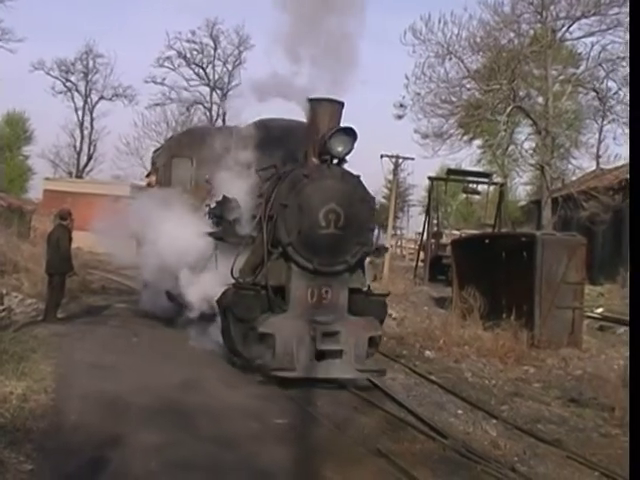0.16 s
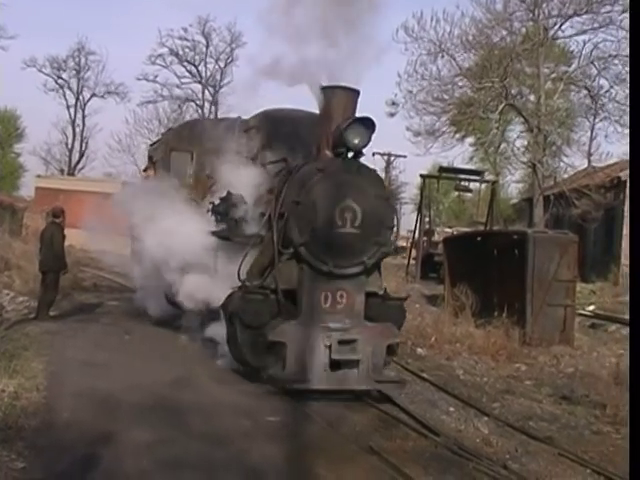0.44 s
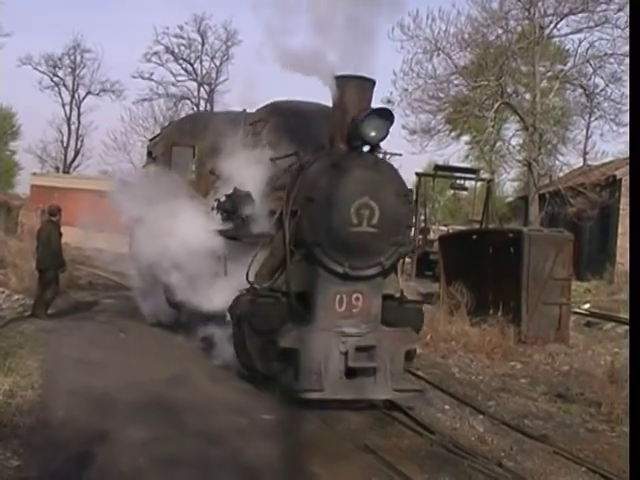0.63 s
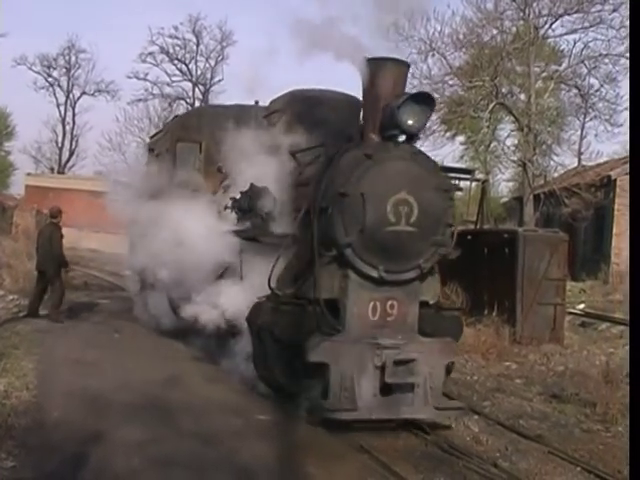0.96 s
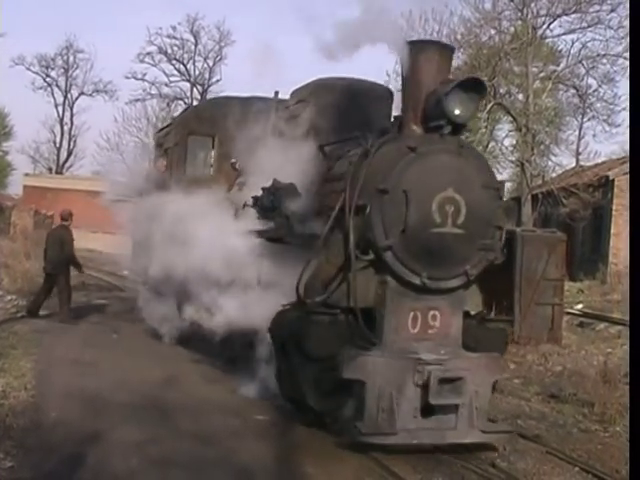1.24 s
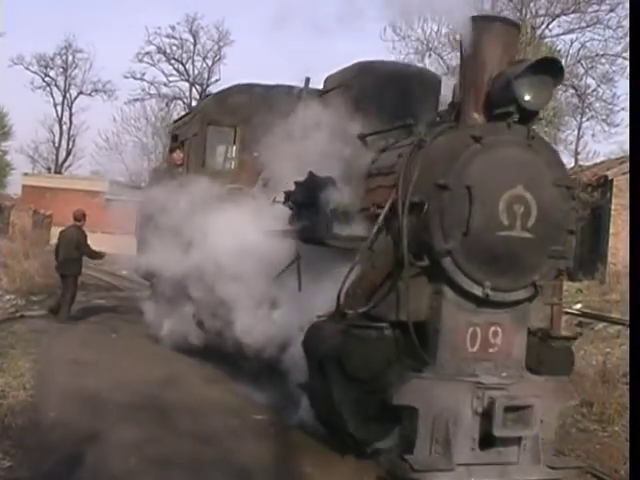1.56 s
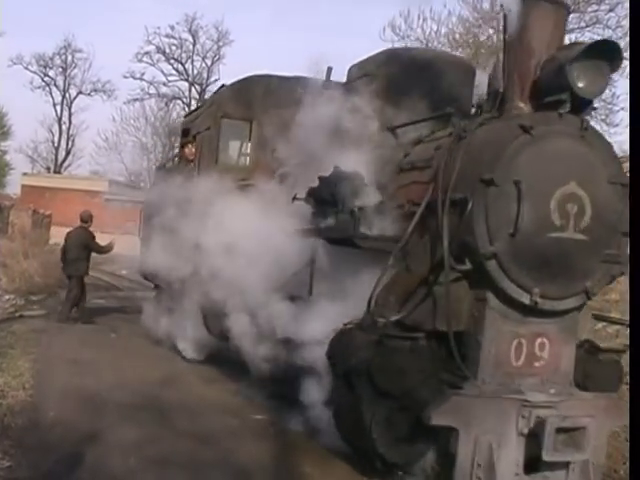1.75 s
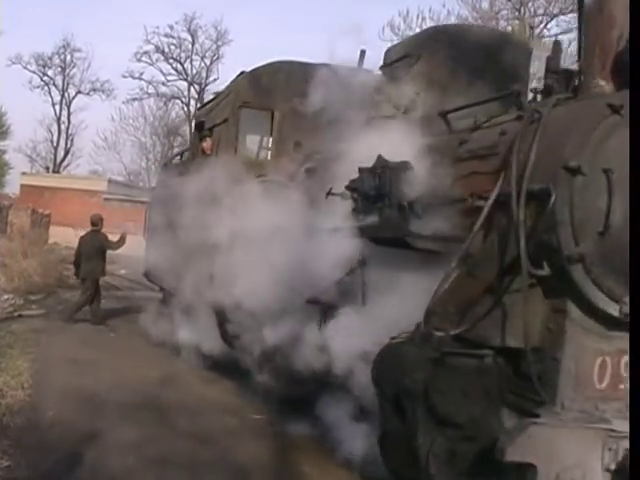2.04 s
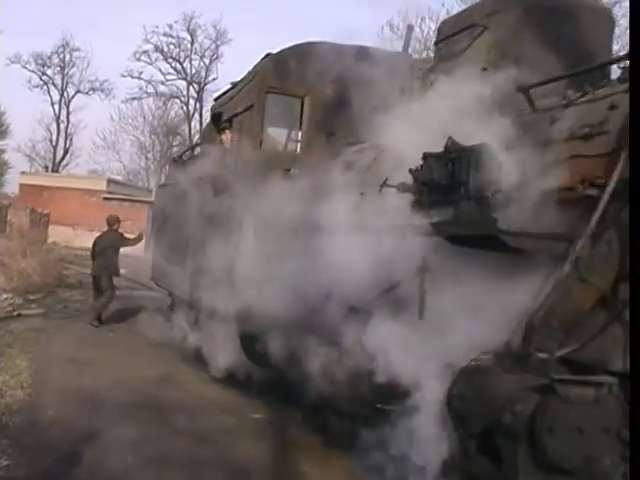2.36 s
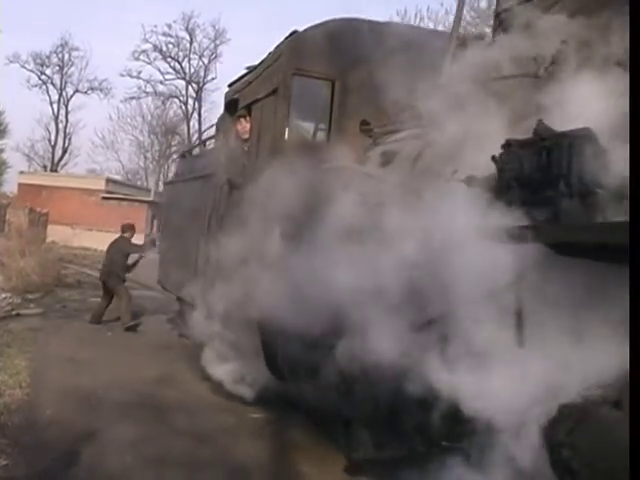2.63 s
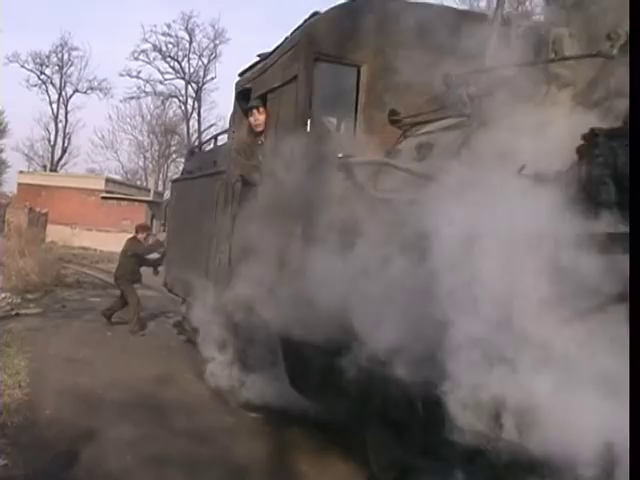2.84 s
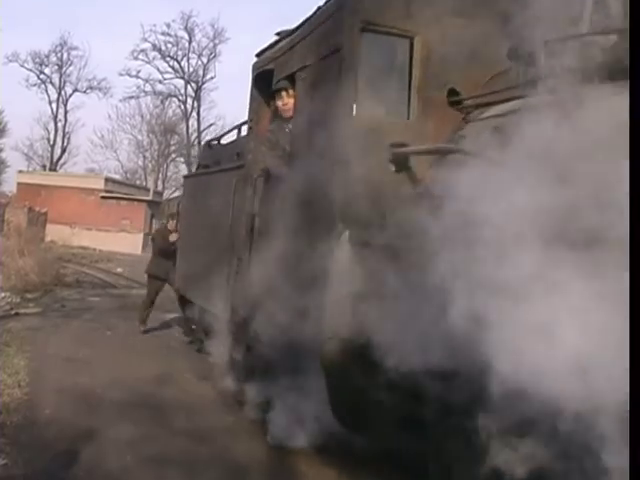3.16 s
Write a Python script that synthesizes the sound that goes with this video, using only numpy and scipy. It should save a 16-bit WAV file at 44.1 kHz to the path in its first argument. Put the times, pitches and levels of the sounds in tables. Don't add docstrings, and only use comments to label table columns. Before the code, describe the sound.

A small steam locomotive passes in an open yard, close to a stereo microphone. Hollow, low chimney puffs beat about nine times a second irregularly, strongest from 0.5 to 2.7 s, over a humming draught. Wet steam hisses and spits, moving right. Dry metal knocks begin near 0.7 s and crowd together after 1.4 s, with brief clinks and dull short echoes. After 2.9 s puffs and hiss weaken; knocks continue to 3.3 s.

```python
import sys
import numpy as np
from scipy import signal
from scipy.fft import rfft, irfft
from scipy.io import wavfile
from scipy.ndimage import uniform_filter1d

SR = 44100
rng = np.random.default_rng(int(sys.argv[2]) if len(sys.argv) > 2 else 0)


def nominal_scale(level):
    x = np.asarray(level, float) / 20
    return 10 ** x


def unload_audio(sound):
    columns = np.transpose(np.atleast_2d(sound))
    steps = np.round(np.clip(columns, -1, 1) * 32767)
    wavfile.write(sys.argv[1], SR, steps.astype(np.int16))


N = 145530
T = np.arange(N) / SR

# t/s of the peak, level/dB, length/s, overtones/dB
EXHAUST_BEATS = [(0.148, -33.5, 0.047, 10), (0.188, -31, 0.015, 0.5), (0.32, -29.5, 0.098, 3),
                 (0.427, -33.5, 0.079, -5), (.52, -22, 0.045, -1), (0.679, -27, 0.06, -3),
                 (0.727, -32, 0.025, -3.5), (0.861, -25, 0.045, -0.5), (0.905, -24.5, 0.039, -16),
                 (1.02, -24, 0.088, -4), (1.212, -20, 0.026, -2), (1.299, -28, .04, -18),
                 (1.361, -25, 0.034, 1.5), (1.406, -28, 0.03, -2), (1.548, -26, 0.078, -1.5),
                 (1.617, -36, 0.041, 7.5), (1.693, -24, 0.088, -1.5), (1.769, -24.5, 0.024, -15),
                 (1.85, -25, 0.017, -18), (1.898, -22.5, 0.055, -5), (2.022, -22.5, 0.055, -6.5),
                 (2.128, -29.5, 0.021, -31), (2.204, -25, 0.055, -4), (2.363, -35, 0.21, 3.5),
                 (2.543, -22, 0.051, -5), (2.629, -28.5, 0.015, -3), (2.682, -31, 0.061, 0.5),
                 (2.856, -35.5, 0.066, 7.5), (2.999, -47, 0.11, 10), (3.173, -39, 0.057, 4),
                 (3.245, -53, 0.069, 17.5)]
# f/Hz, width/Hz, level/dB
CHIMNEY_OVERTONES = [(293, 59, 5.5), (493, 100, 4.5), (632, 41, -2), (790, 430, -1.5)]
# t/s, f/Hz
CHIMNEY_PITCH = [(0, 244.1), (.9, 232), (1.7, 215.5), (3.3, 216.1)]
# t/s, level/dB, left-right/dB
STEAM_FLOW = [(0, -42.5, -2.5), (.4, -43.5, -3), (.51, -40.5, -3.5), (.9, -42.5, -2.5), (1.1, -42.5, -3),
              (1.2, -41.5, -4), (1.6, -43, -3), (1.9, -40, -5.5), (2.2, -44.5, -4.5), (2.55, -41.5, -8.5),
              (2.89, -43.5, -9.5), (2.91, -48, -10.5), (3.05, -53.5, -15.5), (3.3, -53, -19)]
# f/Hz, level/dB per Hz
STEAM_COLOUR = [(400, -9), (600, -13), (1200, -10), (2900, -8.5), (3800, -11.5), (7000, -12.5),
                (11000, -15), (14300, -18.5)]
# t/s, level/dB
SPUTTER_LEVEL = [(0, -50), (.5, -41), (.65, -45), (1.15, -43.5), (1.45, -43.5), (2.1, -44.5), (2.2, -41.5),
                 (2.3, -53), (2.45, -42), (2.85, -40.5), (2.93, -47.5), (3.3, -48.5)]
# t/s, peak level/dB, colour f/Hz, left-right/dB, t60/s
# (time to fall 60 dB)
KNOCKS = [(0.678, -16.5, 2150, 3.5, 0.17), (3.12, -22, 3020, -3, 0.11), (.976, -19, 3340, 2, 0.12),
          (1.366, -16, 1530, 3, 0.14), (1.506, -29, 1590, 1.5, 0.18), (1.612, -20, 970, -7, 0.24),
          (1.661, -21.5, 3020, -4, 0.11), (1.895, -18, 983, -3.5, 0.1), (1.942, -16.5, 2380, -3, 0.11),
          (2.032, -16, 2040, 3, 0.12), (2.164, -23, 1200, 1.5, 0.91), (2.35, -26, 1490, -2, 0.76),
          (2.445, -25.5, 1030, 5, 0.54), (2.616, -24, 1500, -6, 0.051), (2.678, -15, 1300, -2.5, 0.18),
          (2.731, -22.5, 2030, 2, 0.14), (2.815, -20, 1240, -2, 0.064), (2.894, -17.5, 1280, -14, 0.059),
          (3.009, -23, 1450, -8, 0.055), (3.136, -21.5, 2970, -4, 0.11), (3.166, -16, 700, -8.5, 0.086),
          (3.229, -19.5, 1410, -8, 0.1), (3.246, -19.5, 2290, -5, 0.068)]
# f/Hz, level/dB, t60/s
ROD_MODES = [(1140, -13, 0.09), (1300, -10, 0.19), (2030, 0, 0.0077), (2410, -7, 0.018),
             (2890, -6.5, 0.023), (4390, -21, 0.19)]
# t/s, peak level/dB, f/Hz, t60/s
CLINKS = [(.679, -29, 2210, 0.025), (0.68, -39, 2800, 0.032), (0.685, -28, 1870, .06),
          (1.196, -24.5, 1850, .03), (1.367, -21, 2770, .05), (1.368, -27, 4190, .04),
          (1.372, -28, 2170, 0.033), (1.506, -28, 1590, 0.046), (1.51, -30, 2360, 0.054),
          (1.613, -28, 970, 0.039), (1.62, -24, 1085, 0.077), (1.663, -23, 3450, .03),
          (1.665, -29, 2850, 0.044), (1.712, -29, 2020, 0.036), (1.945, -28, 2440, .06),
          (2.032, -25.5, 1164, .1), (2.031, -19, 4380, .03), (2.031, -30, 2820, .05),
          (2.035, -25, 1980, 0.025), (2.057, -38, 2030, 0.15), (2.165, -35, 1750, 0.043),
          (2.18, -30.5, 1300, .2), (2.208, -31, 2496, .12), (2.216, -32, 4420, 0.088),
          (2.248, -33, 1300, .12), (2.352, -40.5, 2900, 0.066), (2.361, -30, 1467, 0.073),
          (2.378, -32, 2900, .06), (2.446, -26.5, 1050, 0.11), (2.457, -31, 2550, 0.04),
          (2.618, -23.5, 1720, .04), (2.679, -20, 3800, .018), (2.679, -20, 1080, 0.035),
          (2.691, -29.5, 1300, 0.22), (2.731, -24, 2020, 0.076), (2.775, -31, 2550, .1),
          (2.78, -31.5, 1300, 0.12), (2.782, -32, 3900, .04), (2.816, -27, 2290, .03),
          (2.827, -27, 1230, 0.034), (2.959, -34, 1090, .04), (3.036, -37.5, 1250, 0.05),
          (3.082, -35, 1250, .04), (3.137, -26, 2970, .03), (3.232, -23, 1344, 0.032),
          (2.881, -26, 1290, .03), (2.893, -14, 1290, .015), (3.167, -20, 3140, .02),
          (3.247, -27.5, 2410, .04)]
# t/s, level/dB
DRAUGHT_LEVEL = [(0.0, -38), (1.64, -36), (2.88, -35.5), (2.92, -40), (3.3, -42.5)]
# f/Hz, level/dB per Hz
DRAUGHT_COLOUR = [(12, -56), (20, -18.5), (151, -10.5), (228, -2), (344, -13.5), (492, -14), (706, -30),
                  (809, -21), (1200, -28), (1560, -50), (2640, -120)]
# f/Hz, likeness (0 to 1)
CHANNEL_LIKENESS = [(300, 0.97), (700, 0.92), (1620, 0.89), (4870, 0.73), (8000, 0.77), (10500, 0.85),
                    (12500, 1), (14000, 0.44)]
# f/Hz, left-right/dB
MICROPHONE_TILT = [(300, 2.5), (1500, 3.5)]
# delay t/s, level/dB
ECHOES = [
    (.011, -11.5),
    (.027, -18),
]
# t/s, depth/dB
DUCKS = [(0.529, 3.5), (.70, 0), (1.215, 3.5), (1.385, 2), (1.69, 5), (1.905, 1), (2.035, 3.5), (2.55, 2),
         (2.69, 3.5), (2.894, 4.5), (3.168, 2)]


def rms_one(x):
    return x / np.sqrt(np.mean(x ** 2) + 1e-20)


def in_time(rows):
    s, *columns = np.transpose(rows)
    return [np.interp(T, s, column) for column in columns]


def at_hz(points, hz):
    table_hz, values = np.array(points).T
    return np.interp(np.log(hz), np.log(table_hz), values)


def pan(left_right_db):
    return nominal_scale(np.multiply.outer([.5, -.5], np.atleast_1d(left_right_db)))


def drift(rate_hz):
    hop = 40
    r = np.exp(-2 * hop * np.pi * rate_hz / SR)
    chance = rng.standard_normal(N // hop + 2002)
    slow = signal.lfilter([1], [1, -2 * r, r * r], chance)[2000:]
    return np.interp(np.arange(N) / hop, np.arange(len(slow)), rms_one(slow - slow.mean()))


def resonance(x, hz, width_hz):
    r = np.exp(-np.pi * width_hz / SR)
    gain = (1 - r * r) / 2
    poles = [1, -2 * r * np.cos(2 * np.pi * hz / SR), r * r]
    return signal.lfilter(np.array([1, 0, -1]) * gain, poles, x + 1e-18)


def banded_noise(spectrum, edges, shared_db, own_db):
    out = 0
    together = drift(19.0)
    white = rng.standard_normal((2, 2, N))
    for k, (low, high) in enumerate(zip(edges, edges[1:])):
        band = signal.butter(2, [low, high], "band", fs=SR, output="sos")
        mid, side = signal.sosfilt(band, white[k % 2])
        hz = np.sqrt(low * high)
        alike = np.clip(at_hz(CHANNEL_LIKENESS, hz), 0, 1)
        gain = nominal_scale(at_hz(spectrum, hz) + shared_db * together + own_db * drift(27))
        stereo = np.sqrt(1 + alike) * mid + np.sqrt(1 - alike) * side * [[1], [-1]]
        out = out + gain * pan(at_hz(MICROPHONE_TILT, hz)) * stereo
    return rms_one(out)


def beats():
    thump_hz, thump_width_hz, thump_db = 104, 73, -22
    white = rng.standard_normal((3, N))
    tone = chimney()
    upper = 0
    for k, (hz, width_hz, db) in enumerate(CHIMNEY_OVERTONES):
        upper = upper + nominal_scale(db) * rms_one(resonance(white[1], hz, width_hz)) * (-1) ** k
    upper = rms_one(upper)
    upper = upper / np.sqrt(uniform_filter1d(upper ** 2, size=500) + 0.12)
    thump = rms_one(resonance(white[2], thump_hz, thump_width_hz))
    push, sharp = np.zeros(N), np.zeros(N)
    for s, db, length, overtone_db in EXHAUST_BEATS:
        spread = np.where(T < s, .3, .45) * length
        shape = np.exp(-.5 * ((T - s) / spread) ** 2)
        push += nominal_scale(db) * shape
        sharp += nominal_scale(db + overtone_db) * shape ** 1.27
    return pan(2.7) * push * (tone + nominal_scale(thump_db) * thump) + pan(2.8) * sharp * upper


def chimney():
    width_hz, wander_hz = 26.6, 13.01
    r = np.exp(-np.pi * width_hz / SR)
    chance = [1, 1j] @ rng.standard_normal((2, N + 2000))
    sway = signal.lfilter([1], [1, -r], signal.lfilter([1], [1, -r * r], chance))[2000:]
    power = np.abs(sway) ** 2
    sway = sway / np.sqrt(power + 0.87 * np.mean(power))
    pitch_hz = in_time(CHIMNEY_PITCH)[0] + wander_hz * drift(8.0)
    return rms_one((sway * np.exp(2j * np.pi * np.cumsum(pitch_hz) / SR)).real)


def steam():
    flow_db, left_right_db = in_time(STEAM_FLOW)
    hiss = banded_noise(STEAM_COLOUR, np.geomspace(500, 17000, 15), shared_db=-0.5, own_db=0.5)
    return nominal_scale(flow_db + 6.5) * pan(left_right_db) * hiss


def sputter():
    spits_per_s, spit_cycles, pitches = 1500, 14.0, 14
    whistle_hz, whistle_width_hz, whistle_db = 2900, 180, -9.5
    sizes = nominal_scale(2.5 * np.minimum(rng.exponential(1, N), 4)) * rng.choice([-1, 1], N)
    born = rng.random(N) < spits_per_s * nominal_scale(5.0 * drift(10)) / SR
    dealt = rng.integers(0, pitches, N)
    sides_db = rng.normal(0, 6.9, N)
    spits = 0
    for k, hz in enumerate(np.geomspace(900, 3600, pitches)):
        drops = pan(sides_db) * sizes * born * (dealt == k)
        spits = spits + nominal_scale(5.3 * drift(10.0)) * resonance(drops, hz, 2 * hz / spit_cycles)
    whistle = rms_one(resonance(rng.standard_normal(N), whistle_hz, whistle_width_hz))
    whistle = nominal_scale(whistle_db - 4.6 * T + 3.2 * drift(10)) * whistle
    return nominal_scale(in_time(SPUTTER_LEVEL)[0]) * (rms_one(spits) + whistle)


def knocks():
    crack_low_hz, crack_high_hz, crack_db = 557, 4330, -11.5
    colour_db, colour_q, ring_db = -22.5, 4.3, -38
    soft_db, rise_s, scrape_s = -24, 0.0019, .008
    tick_s, tick_delay_s = .2, .0015
    front_db, front_share = 0.5, 0.3
    roughness = rng.standard_normal(N)
    lumps_db = 2.2 * rng.standard_normal(N // 60 + 1).repeat(60)[:N]
    grit = rms_one(roughness * nominal_scale(lumps_db))
    out, strikes = np.zeros((2, N)), np.zeros((2, N))
    cut = signal.butter(3, [crack_low_hz, crack_high_hz], "band", fs=SR, output="sos")
    for s, db, hz, left_right_db, t60 in KNOCKS:
        i, t60 = int(s * SR), max(t60, .01)
        t = T[:min(N - i, SR // 4)]
        here = slice(i, i + len(t))
        hard = np.clip((db - soft_db) / 10, 0, 1)
        half_wave = np.sin(np.pi * np.clip((t - tick_delay_s) * hz * 2, 0, 1))
        tick = hard ** 2 * tick_s / t60 * half_wave
        rise = np.minimum(t / (rise_s + scrape_s * (1 - hard)), 1)
        fade = nominal_scale(db - 60 * t / t60)
        front = hard * nominal_scale(db + front_db - 60 * t / t60 / front_share)
        burst = (tick + grit[here] * rise) * (fade + front)
        strikes[:, here] += pan(left_right_db) * burst
        crack = nominal_scale(crack_db - 1.8 * (1 - hard)) * 2 * signal.sosfilt(cut, burst)
        colour = nominal_scale(colour_db) * 10 * resonance(burst, hz, hz / colour_q)
        out[:, here] += pan(left_right_db) * (crack + colour)
    for hz, db, t60 in ROD_MODES:
        r, w = nominal_scale(-60 / (t60 * SR)), 2 * np.pi * hz / SR
        shake = nominal_scale(ring_db + db + 3.0 * drift(10)) * strikes
        out += signal.lfilter([0, np.sin(w)], [1, -2 * r * np.cos(w), r * r], shake + 1e-18)
    return out


def clinks():
    attack_s, twin_share, twin_spread = 0.0009, 0.3, 0.061
    out = np.zeros(N)
    chance = rng.uniform(-1, 1, (len(CLINKS), 2))
    for (s, db, hz, t60), (apart, turn) in zip(CLINKS, chance):
        i = int(s * SR)
        t = T[:min(N - i, SR // 4)]
        twin_hz = hz * (1 + twin_spread * apart)
        twin = np.sin(2 * np.pi * twin_hz * t + np.pi * turn)
        pair = np.sin(2 * np.pi * hz * t) + twin_share * twin
        fade = nominal_scale(db - 60 * t / max(t60, .01))
        out[i:i + len(t)] += fade * np.minimum(t / attack_s, 1) * pair
    rattle = rms_one(nominal_scale(3.5 * drift(120)))
    return pan(0.47 * in_time(STEAM_FLOW)[1]) * out * rattle


def roar():
    air = banded_noise(DRAUGHT_COLOUR, np.geomspace(20, 1200, 17), shared_db=0.5, own_db=2.4)
    hum = pan(2.9) * nominal_scale(-11.5 + 1.0 * drift(5.7)) * chimney()
    return nominal_scale(in_time(DRAUGHT_LEVEL)[0] + 1.5) * (air + hum)


def yard(x):
    dull = signal.lfilter([.4], [1, -.6], x)
    out = np.zeros((2, N))
    for s, db in ECHOES:
        for side in range(2):
            lag = int(s * SR * (1 + 0.16 * side))
            out[side, lag:] += nominal_scale(db) * dull[side, :N - lag]
    return out


def limiter_db():
    attack_s, recover_s = 0.0036, 0.21
    start_s, depth_db = np.array(DUCKS).T[:, :, None]
    after = T - start_s
    shape = np.clip(after / attack_s, 0, 1) * np.exp(-np.maximum(after, 0) / recover_s)
    return -(depth_db * shape).sum(axis=0)


def scene():
    hits = knocks() + clinks()
    steady = steam() + roar() + sputter()
    return nominal_scale(limiter_db() + 2.5) * steady + beats() + hits + yard(hits)


def low_pass(x):
    return signal.sosfilt(signal.butter(12, 15200, fs=SR, output="sos"), x)


def record(dry):
    top_hz, top_db, open_percent = 14420, -11, 22
    thin_bass = signal.butter(2, 40, "high", fs=SR, output="sos")
    dry = .5 * np.tanh(signal.sosfilt(thin_bass, dry) / .5)
    hz = np.arange(N // 2 + 1) * SR / N
    top = irfft(rfft(dry) * (hz > top_hz), N)
    top_power = uniform_filter1d(top[0] ** 2, size=3000)
    share = top_power ** 2 / uniform_filter1d(dry[0] ** 2, size=2500)
    is_open = 1. * (share > np.percentile(share, 100 - open_percent))
    passing = uniform_filter1d(is_open, size=500)
    mix = dry - top * (1 - nominal_scale(top_db) * passing)
    return low_pass(mix)


dry = scene()
out = record(dry)
unload_audio(out)
```